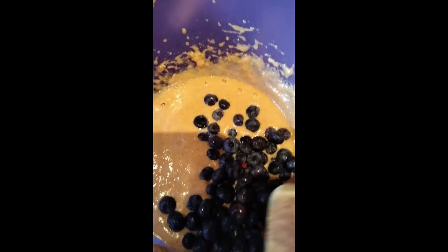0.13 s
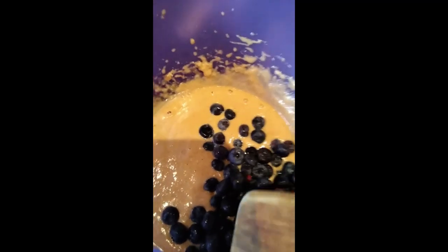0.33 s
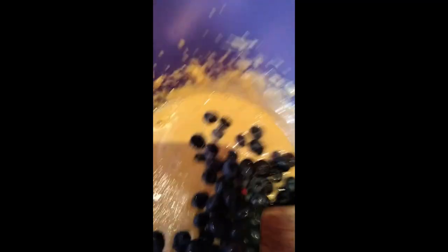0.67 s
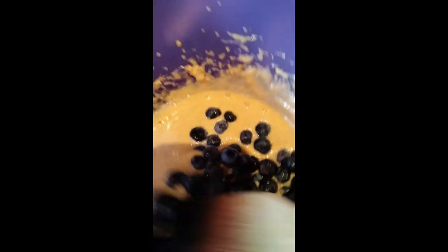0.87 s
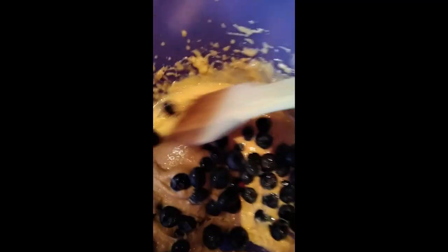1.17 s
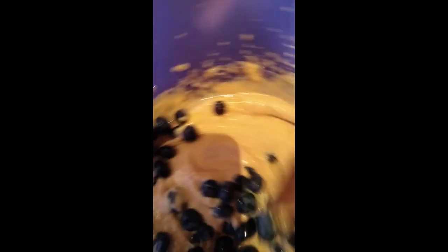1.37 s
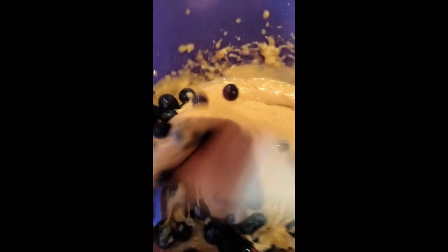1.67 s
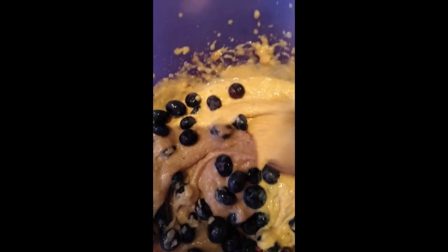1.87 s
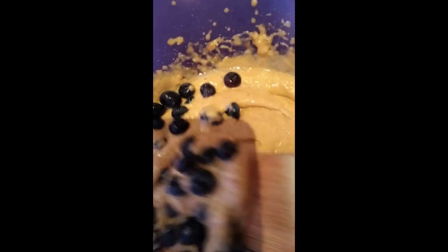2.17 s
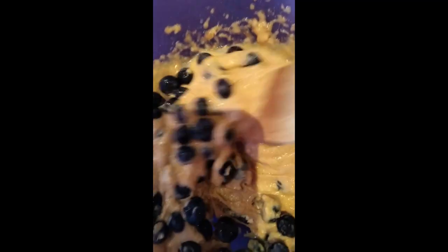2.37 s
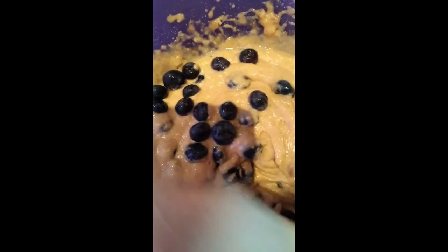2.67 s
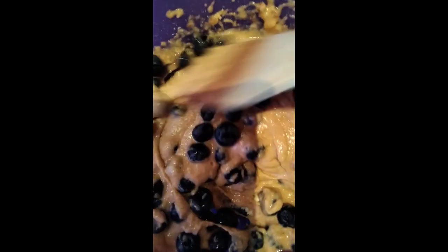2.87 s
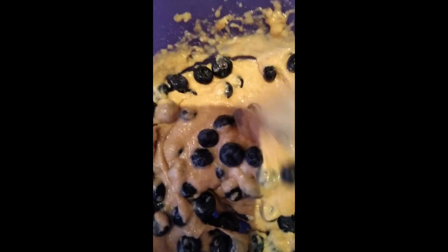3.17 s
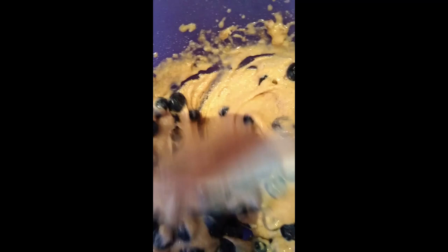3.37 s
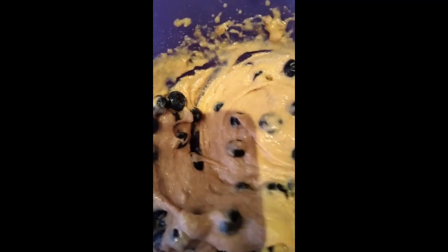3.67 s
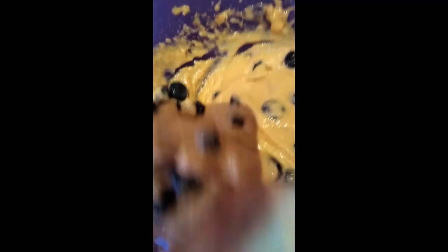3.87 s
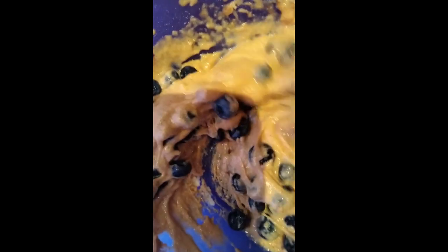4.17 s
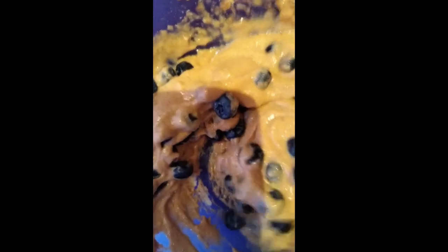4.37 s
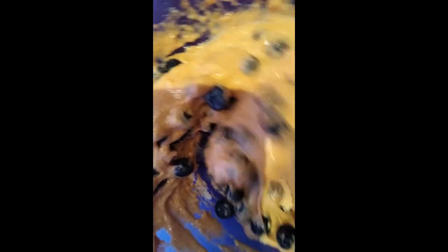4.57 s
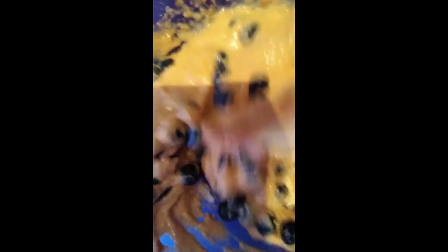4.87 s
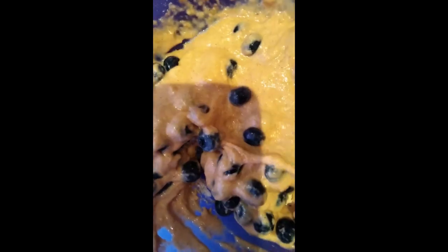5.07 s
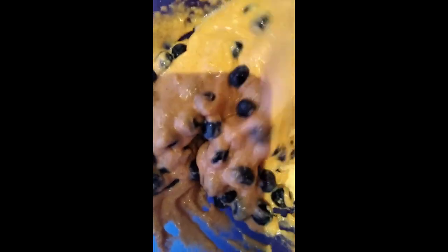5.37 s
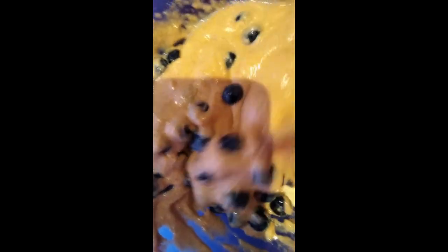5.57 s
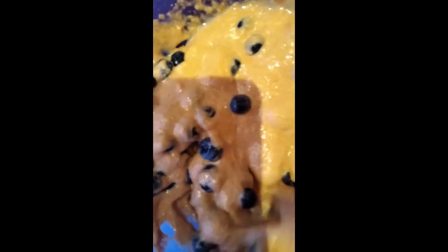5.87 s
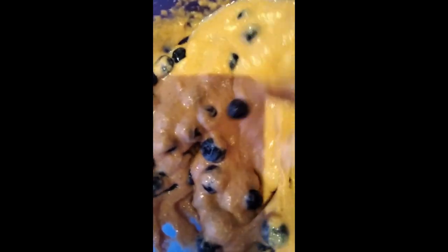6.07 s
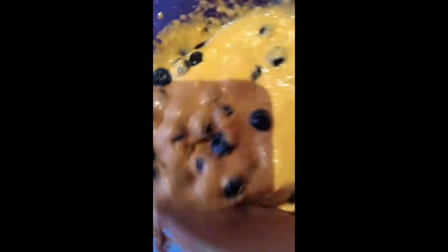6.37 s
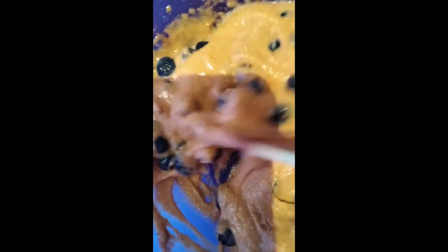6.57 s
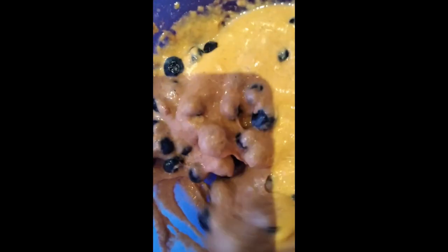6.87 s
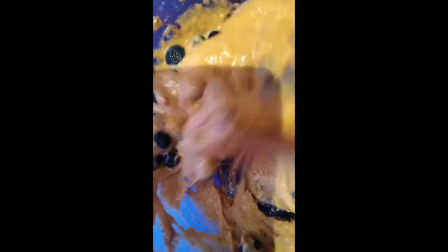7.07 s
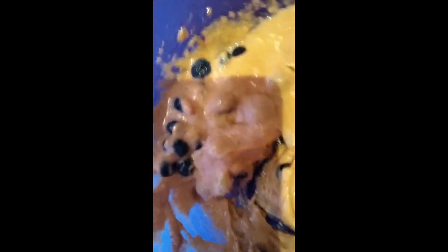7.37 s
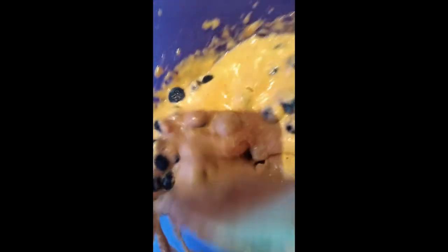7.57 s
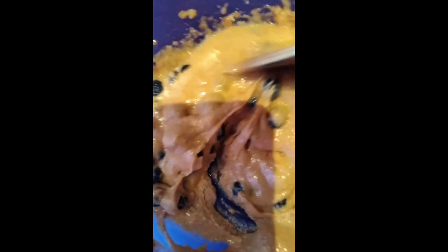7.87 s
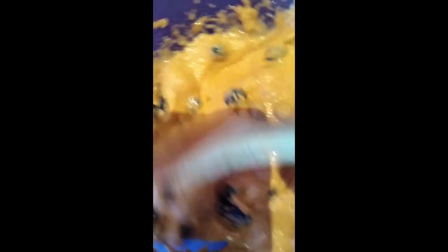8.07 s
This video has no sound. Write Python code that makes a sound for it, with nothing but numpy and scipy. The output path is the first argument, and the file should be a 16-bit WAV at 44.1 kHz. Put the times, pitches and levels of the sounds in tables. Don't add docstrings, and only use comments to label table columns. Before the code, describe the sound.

Very close stereo handheld microphone in a quiet kitchen. After a near-silent start, a wooden spatula folds thick batter in a plastic bowl: each stroke begins with a hollow knock and drags into a low hum, dry rasp and wet fizz. Sticky smacks and ticks fill the gaps. A glass on the left rings clearly early on, then faintly later.

```python
import sys
import numpy as np
from scipy import signal
from scipy.fft import rfft, irfft, next_fast_len
from scipy.io import wavfile
from scipy.ndimage import uniform_filter1d

SR = 44100
rng = np.random.default_rng(int(sys.argv[2]) if len(sys.argv) > 2 else 0)


def put_to_file(sound):
    columns = np.atleast_2d(sound).T
    safe = np.clip(columns, -1, 1)
    whole_steps = np.round(safe * 32767)
    wavfile.write(sys.argv[1], SR, whole_steps.astype(np.int16))


def undo_db(level):
    steps = np.asarray(level, float) / 20
    return 10 ** steps


N = 362502


def evened(x):
    return x / np.sqrt(np.mean(x ** 2) + 1e-20)


def peaked(x, db):
    return undo_db(db) * x / abs(x).max()


def read(points, hz):
    f, value = np.transpose(points)
    return np.interp(np.log(hz + 1), np.log(f + 1), value)


def add(mix, s, sound):
    part = mix[..., round(s * SR):][..., :sound.shape[-1]]
    part += sound[..., :part.shape[-1]]


def resonate(x, hz, width):
    pole = np.exp((2j * np.pi * hz - np.pi * width) / SR)
    return 2 * signal.lfilter([1 - abs(pole)], [1, -pole], x).real


def steep(x, hz, width):
    return resonate(resonate(x, hz, width), hz, 3 * width)


def shaped(x, gain):
    size = next_fast_len(N)
    return irfft(rfft(x, size) * gain(np.fft.rfftfreq(size, 1 / SR)), size)[..., :N]


def sides(pan_db):
    half_db = np.asarray(pan_db) / 2
    return undo_db(np.array([half_db, -half_db]))


def paired(a, b, alike):
    share = lambda hz: np.clip(read(alike, hz), 0, 1)
    rest = lambda hz: np.sqrt(1 - share(hz) ** 2)
    return np.array([shaped(a, share) + shaped(b, rest), a])


def wander(hz):
    return evened(shaped(rng.standard_normal(N), lambda f: 1 / (1 + (f / hz) ** 4)))


def patchy(x, patch_db):
    z = signal.stft(x, nperseg=256)[2]
    clumps = uniform_filter1d(rng.standard_normal(z.shape[1:]), size=6, axis=0)
    clumps = uniform_filter1d(clumps, size=8, axis=1)
    return evened(signal.istft(z * undo_db(patch_db * evened(clumps)), nperseg=256)[1][:, :N])


def drifting(x, share, chance, speed=1):
    place = np.cumsum(speed * (1 + share * np.tanh(chance)))
    return np.array([np.interp(place % (N - 1), np.arange(N), v) for v in x])


# f/Hz, level/dB per Hz
KITCHEN = [(28, -3.5), (53, 0.5), (80, -21), (120, -2), (185, -21), (390, -18), (1600, -52), (16000, -59)]
# f/Hz, likeness/0-1 (below 0 counts as none)
KITCHEN_ALIKE = [(60, -1), (380, -0.35), (2380, -0.03), (15000, -0.02)]


def kitchen():
    air = paired(*rng.standard_normal((2, N)), KITCHEN_ALIKE)
    return undo_db(-56) * patchy(shaped(air, lambda hz: undo_db(read(KITCHEN, hz))), 0.87)


# factor on the wall pitch, width/Hz, right level/dB, left level/dB
WALL = [(0.59, 90, -16, -1), (0.79, 87.8, 5, 4.5), (1.01, 94.8, 12, 2), (1.331, 120, -8, -0.5)]


def wall(force, pitch_hz, spot_db=(0, 0, 0, 0)):
    left, right = 0, 0
    for (factor, width, right_db, left_db), more_db in zip(WALL, spot_db):
        ring = undo_db(more_db) * steep(force, factor * pitch_hz, width)
        left = left + undo_db(left_db) * ring
        right = right + undo_db(right_db) * ring
    return np.array([left, right])


# start t/s, length/s, share of the length before the peak/0-1,
# pressure level/dB, wet film level/dB
STROKES = [(0.28, 0.094, 0.44, -82, -83), (0.665, 0.17, 0.17, -51.5, -72), (1.001, 0.041, 0.2, -54, -58),
           (4.246, 0.062, 0.24, -75.5, -78.5), (4.699, 0.046, 0.74, -55.5, -79),
           (7.242, 0.056, 0.58, -54.5, -74.5), (7.761, 0.06, 0.3, -79, -63), (8.09, 0.06, 0.75, -60, -68),
           (0.716, 0.3, 0.94, -63, -52), (1.055, 0.081, 0.26, -64, -57.5), (1.156, 0.18, 0.41, -33.5, -53),
           (1.321, 0.47, 0.41, -43, -53), (1.611, 0.25, 0.04, -50, -53.5),
           (2.059, 0.379, 0.28, -49.5, -54.5), (2.67, 0.2, 0, -42.5, -48), (2.791, 0.23, 0.56, -36, -52.5),
           (3.283, 0.26, 0.64, -50, -55), (3.541, 0.1, 0.52, -72.5, -62.5), (3.702, 0.45, 0.21, -47.5, -50),
           (4.17, 0.059, 0.4, -53.5, -68), (4.299, 0.18, 0.68, -61, -56), (4.519, 0.19, 0.53, -44.5, -60.5),
           (5.146, 0.26, 0.16, -50.5, -55.5), (5.449, 0.13, 0.65, -33, -52.5),
           (5.579, 0.26, 0.21, -45.5, -54.5), (6.038, 0.11, 0.51, -41.5, -52.5),
           (6.118, 0.444, 0.49, -47.5, -52), (6.652, 0.2, 0.6, -58, -58), (6.88, 0.36, 0.04, -46.5, -53.5),
           (7.349, 0.41, 0.34, -52.5, -56.5), (7.846, 0.25, 0.58, -30, -52.5),
           (8.148, 0.091, 0.82, -54, -54.5)]
DRY_DB = [0, -12, 1, 1, -10, -4, 1, 0, -35, 2, -7, 1.5, -1, -5.5, 9.5, -1, 5, -3, 3, -2, 6.5, -6, 1.5, -4,
          2, -1.5, 8.5, -1, -0.5, -0.5, -7.5, -4]
# middle t/s, half width/s, bite level/dB, pressure level/dB
BITES = [(0.703, 0.12, -46.5, -80), (1.031, 0.011, -46.5, -49), (1.07, 0.0038, -33.5, -49.5),
         (1.417, 0.048, -36, -36.5), (1.62, 0.035, -41, -37), (1.684, 0.021, -29.5, -45),
         (2.327, 0.085, -45, -66), (2.415, 0.057, -62.5, -57), (2.746, 0.023, -30.5, -41.5),
         (2.959, 0.018, -33, -29), (3.374, 0.046, -47, -44.5), (3.86, 0.033, -42.5, -52),
         (4.124, 0.0078, -43, -52), (4.438, 0.016, -43.5, -54.5), (4.56, 0.014, -37.5, -49.5),
         (5.242, 0.022, -26, -35.5), (5.313, 0.012, -37, -50), (5.537, 0.024, -40.5, -52.5),
         (5.685, 0.028, -30, -45), (6.256, 0.032, -32.5, -33), (6.313, 0.018, -26, -36.5),
         (1.075, 0.0059, -69, -41.5), (6.9, 0.0049, -33, -53), (7.043, 0.028, -38, -38),
         (6.53, 0.0067, -47.5, -56), (7.352, 0.052, -82, -52), (7.585, 0.063, -40.5, -44.5),
         (7.931, 0.032, -58.5, -29.5), (8.006, 0.018, -31.5, -58), (8.052, 0.041, -33.5, -36.5)]


def contact(t):
    land_s, part_s = 0.004, 0.013
    rasp_share = 0.9
    skim_s, shudder_t60_s = 0.024, 0.44
    press, rasp, film = np.zeros((3, N))
    down, brush = np.zeros((2, N))
    for (start, length, share, press_db, film_db), dry_db in zip(STROKES, DRY_DB):
        share = np.clip(share, .05, .95)
        u = (t - start) / length
        rise = np.clip(1 - u / share, 0, 1) ** 1.08
        fall = np.clip((u - share) / (1 - share), 0, 1) ** 1.2
        touch = np.clip(np.minimum(u / land_s, (1 - u) / part_s) * length, 0, 1)
        p_db = press_db - 16 * rise - 20 * fall
        f_db = film_db - 24.5 * rise - 12 * fall
        press = press + touch * undo_db(p_db)
        down = np.maximum(down, touch)
        film = film + touch * undo_db(f_db)
        rasp = rasp + touch * undo_db(rasp_share * p_db + (1 - rasp_share) * f_db - 3 + dry_db)
    for s, width, bite_db, press_db in BITES:
        arch = np.exp(-abs((t - s) / width) ** 1.5)
        press = press + undo_db(press_db) * arch
        rasp = rasp + undo_db(bite_db) * arch
        film = film + undo_db(bite_db - 22.5) * arch
    for s, blow_db, *_ in KNOCKS:
        press = press + (t > s) * undo_db(blow_db - 18.5 - 60 * abs(t - s) / shudder_t60_s)
        skim = (t > s - skim_s) * (t <= s) * undo_db(blow_db - 31)
        press = press + skim
        brush = brush + skim * undo_db(-15.0)
    return press, rasp * down + brush, film * down, down


def slips(per_s, spread_db, smooth):
    size = undo_db(spread_db * np.minimum(rng.exponential(1, N), 4)) * rng.choice([-1., 1.], N)
    clicks = evened(size * (rng.random(N) < per_s / SR))
    return evened(clicks + smooth * rng.standard_normal(N))


BITE_HZ = [1660, 2600, 3270, 1885, 2478, 2830, 2500, 2480, 3000, 2430, 2270, 2400, 1985, 3200, 2660, 2230,
           2500, 1970, 3320, 2110, 2600, 1800, 2400, 2340, 2700, 1390, 2900, 1900, 3300, 1890]


def bites(rough):
    out = np.zeros((2, N))
    for (s, width, bite_db, _), hz in zip(BITES, BITE_HZ):
        at = round((s - 3 * width) * SR)
        part = rough[:, at:at + round(6 * width * SR)]
        t = np.arange(part.shape[1]) / SR
        arch = np.exp(-abs((t - 3 * width) / width) ** 1.3)
        add(out, at / SR, undo_db(bite_db - 14) * arch * evened(steep(part, hz, 0.24 * hz)))
    return out


RIM_HZ, RIM_WIDTH = 1076, 110
# f/Hz, width/Hz, level/dB
THUD = [(90, 136, -4.5), (156.2, 19, 0.3)]
# f/Hz, width/Hz, level/dB
RASP = [(1030, 280, 11), (1874, 120, 11), (2400, 420, 5), (2994, 600, 8.5), (4300, 750, -12)]
# f/Hz, level/dB per Hz
FIZZ = [(900, -8.5), (2000, -4), (4000, -3), (6500, -3.5), (9300, -4), (11000, -11), (13000, -16.5),
        (15500, -25)]
# f/Hz, likeness/0-1
ALIKE = [(200, .9), (1000, .85), (3000, .6), (6000, .45), (16000, .3)]
# t/s, f/Hz
HEIGHT = [(1.25, 500.1), (2.72, 460.2), (2.88, 570.3), (3.35, 430.5), (5.4, 560.3), (7.88, 479.3),
          (8.05, 530.7)]


def drag():
    t = np.arange(N) / SR
    press, scrape, wet, down = contact(t)
    pressure = wander(33)

    stick = steep(slips(300, 2.2, 1.1) * undo_db(0.6 * pressure), 600, 1300)
    sag = evened(uniform_filter1d(pressure, size=2500))
    height = np.interp(t, *np.transpose(HEIGHT)) / 524
    hum = drifting(wall(stick, 524), .09, sag, height)
    hum = patchy(hum + undo_db(-3.5) * steep(stick, RIM_HZ, RIM_WIDTH), 3.0)

    counter = paired(*rng.standard_normal((2, N)), [(40, 0.23), (250, 0.24)])
    counter = counter * undo_db(6.0 * np.tanh(wander(16)))
    rumble = evened(sum(undo_db(db) * steep(counter, f, 2.4 * w) for f, w, db in THUD))
    rumble = rumble * sides(5.0)[:, None]

    rough = paired(slips(1400, 4.4, 0.44), slips(1900, 1.9, 0.87), ALIKE)
    modes = [undo_db(db) * steep(rough, f, w) for f, w, db in RASP]
    loose = drifting(sum(modes[2:]), .05, wander(6))
    rasp = patchy(steep(sum(modes[:2]) + loose, 2600, 3500), 4.0)

    film = paired(slips(1900, 3.4, 11.0), slips(1900, 4.0, 0.92), ALIKE)
    fizz = patchy(shaped(film, lambda hz: undo_db(read(FIZZ, hz))), 0.93)

    upper = scrape * undo_db(-13.5 + 1.2 * pressure) * rasp + down * bites(rough)
    upper = upper + wet * undo_db(-2.0 + 2.97 * wander(47)) * fizz
    ooze = undo_db(-85 + 4.0 * wander(60)) * (fizz + .3 * rasp) * (t > .66)
    lower = uniform_filter1d(press, size=350) * undo_db(1) * hum
    lower = lower + undo_db(-72) * hum * (t > STROKES[1][0])
    shifting = undo_db(-37.5) * press ** 0.42 * rumble
    return lower + shifting + (upper + ooze) * sides(-9)[:, None]


def let_go(pops):
    out, t = np.zeros((2, N)), np.arange(700) / SR
    grit = rng.standard_normal((len(pops), 2, len(t)))
    for (s, db, hz), (a, b) in zip(pops, grit):
        snap = np.array([a + .5 * b, a]) * undo_db(-60 * t / 0.007) * np.minimum(t / 0.0009, 1)
        pop = steep(snap, hz, 0.14 * hz) + 0.19 * steep(snap, 5000, 3000)
        add(out, s, peaked(pop, db) * sides(-9)[:, None])
    return out


# t/s, peak level/dB,
# f/Hz
MORE_SMACKS = [(0.4854, -80, 1860), (1.0181, -41, 2670), (1.082, -32, 2300), (1.378, -33.5, 2240),
               (1.42, -33, 1900), (1.4767, -52, 2307), (2.123, -37.5, 2890), (2.8804, -34, 2300),
               (3.6022, -39, 3770), (3.9827, -36, 1460), (4.0891, -34, 1610), (4.2764, -67, 2110),
               (4.3819, -45, 2100), (4.4432, -27, 3460), (4.497, -64, 2010), (4.558, -42, 2450),
               (4.8743, -51, 5000), (5.1244, -60, 2400), (5.208, -32, 2090), (5.233, -33, 1990),
               (5.301, -36, 2510), (5.6135, -37, 4660), (6.211, -38, 1850), (6.2342, -42, 1870),
               (6.3194, -36, 3810), (6.394, -29, 1630), (6.4, -26.5, 3900), (6.419, -39, 2470),
               (6.53, -34, 4800), (6.546, -40, 6550), (7.024, -33, 3170), (7.152, -36, 8900), (7.604, -33, 1900),
               (7.7737, -50, 3820), (7.784, -50, 2690), (7.989, -25, 1860), (8.1066, -35, 2486),
               (8.1283, -43, 1900)]


def more_smacks():
    return let_go([(s, db - 5.5, hz) for s, db, hz in MORE_SMACKS])


# t/s, blow level/dB, wall f/Hz, counter thud level/dB, edge click level/dB
KNOCKS = [(0.669, -51, 556, -34, -40), (1.074, -69.5, 551, -36.5, -38.5), (1.163, -26.5, 593, -26.5, -58),
          (1.377, -49, 670, -52, -37), (1.571, -32, 418, -25, -24), (2.13, -42.5, 360, -31.5, -98),
          (2.392, -35.5, 377, -45, -87), (2.673, -31, 478, -22, -24), (2.832, -24.5, 537, -22.5, -54),
          (3.302, -23, 603, -24.5, -31.5), (3.763, -36.5, 464, -29.5, -37.5), (3.834, -36.5, 745, -45, -45),
          (3.879, -41, 367, -38, -75), (4.115, -42.5, 351.5, -56, -53), (4.535, -56.5, 650, -60, -52),
          (1.113, -47.5, 541, -40, -84), (5.153, -35.5, 657, -28, -37), (5.455, -25, 493, -36, -92),
          (6.058, -28, 560, -33.5, -50.5), (6.235, -48, 480, -56, -42), (6.763, -38, 418, -36, -37.5),
          (6.895, -25, 604, -25, -47), (7.476, -35, 396, -30.5, -37.5), (7.867, -23, 575, -25, -30.5)]
# low mode level/dB, second mode level/dB, top mode level/dB,
# rim level/dB, left-right level/dB
SPOTS = [(1, -2.5, 3, 6, 10), (-8, -11, 5, 23, -9), (6.5, -1, -2, 0, -5.5), (-1.5, -1.5, 5.5, 3.5, 3),
         (2, -1, 8.5, -7, 2.5), (17.5, 3, 11, -13, 0), (-9, -1.5, 0.5, -15, 5.5), (8.5, 4.5, 6.5, -6.5, 2),
         (5, 0.5, -6, -5, -2.5), (9.5, 4, 7, 1, -6.5), (-8, 5, 10.5, -16, 2.5), (-6, -14, -14, -16, 7),
         (1, 2.5, 1, -10, 5.5), (1.5, 1.5, 2.5, -16, 6.5), (-7, 4, 2, 4.5, -7), (0.5, -2.5, 0, 1, 1),
         (-7, 2.5, 11, -16, 0.5), (-4, -1, -10, 0, 1.5), (0, 0, -13, -4, -1), (-9, 2, -6, 7.5, 3),
         (-9.5, 10, 17.5, 0.5, -6.5), (1, 3.5, 7.5, -4, -1.5), (7, 6.5, 15, -4, 3), (5.5, 0, 2.5, 2.5, -4)]
BOUNCES = [0.047, 0.064, 0.05, .2, 0.13, 0.31, 0.08, 0.14, 0.089, 0.28, 0.13, 0.2, 0.26, 0.16, 0.19, 0.22,
           0.26, 0.14, 0.32, 0.14, 0.14, 0.32, 0.35, 0.8]
FAR_SIDE = [1.57, 2.672]
# t/s, thud level/dB
BUMPS = [
    (1.025, -37),
    (3.706, -44),
    (4.45, -33.5),
    (4.872, -45.5),
    (5.586, -38.5),
]


def knocks():
    push_lead_s, far_lead_s = .001, .001
    choke_s, choke_db = 0.0093, -9.5
    out, t = np.zeros((2, N)), np.arange(6000) / SR
    hits = KNOCKS + [(s, db - 18.5, 513, db, db - 54) for s, db in BUMPS]
    spots = SPOTS + [np.zeros(5)] * len(BUMPS)
    bounces = BOUNCES + [.2] * len(BUMPS)
    luck = rng.random((len(hits), 3))
    grit = rng.standard_normal((len(hits), len(t)))
    push = lambda at, soft: -np.exp(-.5 * ((t - at) / soft) ** 2)
    for hit, (u, v, w), noise, spot, again in zip(hits, luck, grit, spots, bounces):
        s, blow_db, hz, thud_db, click_db = hit
        low_db, second_db, top_db, rim_db, pan_db = spot
        bounce = again * push(0.006195 + 0.0014 * u, 0.0004)
        force = push(0.00073, 0.00031) + bounce + 0.0077 * noise * undo_db(-60 * t / 0.034)

        bent_hz = 560 * (hz / 560) ** .5
        ring = wall(force, bent_hz, (low_db, second_db, 0, top_db))
        ring = ring * undo_db(choke_db / (1 + np.exp(-np.minimum((t - choke_s) / 0.0011, 50))))

        tuning = (1.1 + 0.12 * v, 0.85 + 0.032 * w)
        thud = np.array([sum(undo_db(db) * steep(force, f * k, width) for f, width, db in THUD)
                         for k in tuning])

        rim = resonate(resonate(force, RIM_HZ, RIM_WIDTH), RIM_HZ, 230)
        slap = steep(np.gradient(push(.001, 0.00016)), 1229, 330)
        blade = steep(np.gradient(push(0.00088, .0001)), 1970, 150)
        rim = peaked(rim, 0) + peaked(slap, -13) + peaked(blade, -15)
        rim_level_db = 0.81 * blow_db + 0.27 * click_db + 9 + rim_db + 1.5 * np.log2(hz / 500)
        rim = peaked(rim, rim_level_db) * sides(-13.0)[:, None]

        fading = undo_db(-60 * t / 0.018) + 0.18 * undo_db(-60 * t / 0.14)
        edge = noise * fading * np.minimum(t / 0.00064, 1)
        click = sum(undo_db(db) * resonate(edge, f, 3.1 * width) for f, width, db in RASP)
        click = steep(click, 800, 2400)
        add(out, s, peaked(click, click_db + 3.5) * sides(-20.5)[:, None])

        body = peaked(ring, blow_db + 22.5) * sides(pan_db)[:, None] + rim
        body = body + peaked(thud, thud_db + 7.5) * sides(1.8)[:, None]
        far = min(abs(s - np.array(FAR_SIDE))) < .005
        add(out[0], s - push_lead_s - far * far_lead_s, body[0])
        add(out[1], s - push_lead_s, body[1])
    return out


# middle t/s, length/s, f/Hz, level/dB
SQUEAKS = [
    (0.926, 0.11, 2600, -57.5),
    (1.256, 0.18, 1940, -60),
    (1.436, 0.17, 7090, -56.5),
    (3.992, 0.1, 1440, -53),
    (3.999, .1, 970, -50),
    (5.545, 0.022, 1980, -48),
]


def squeaks():
    out = np.zeros((2, N))
    grit = rng.standard_normal((len(SQUEAKS), SR // 4))
    for (s, length, hz, db), noise in zip(SQUEAKS, grit):
        size = round(length * SR)
        tone = evened(steep(noise, hz, 91))[:size]
        add(out, s - length / 2, undo_db(db) * tone * np.hanning(size))
    return out


# t/s, peak level/dB, f/Hz
TICKS = [(0.8743, -49, 4740), (1.198, -42, 8100), (2.104, -50, 7300), (2.4678, -56.5, 2680),
         (2.5642, -60, 5430), (3.025, -49.5, 7050), (3.049, -68, 4000), (3.081, -55, 3270),
         (3.1485, -62, 7870), (3.161, -55, 9100), (3.2004, -75, 4020), (3.257, -61.5, 2580),
         (4.191, -53, 8600), (4.2562, -60.5, 8800), (4.28, -63, 2980), (4.344, -56, 5870),
         (4.749, -72, 2480), (4.802, -54, 2750), (5.93, -64, 3030), (6.0042, -58, 3080), (6.598, -60, 3910),
         (6.651, -53, 3560), (6.668, -52, 2660), (6.7015, -53, 4970), (6.716, -47, 4760),
         (6.7424, -58, 2660), (6.793, -49, 2570), (7.28, -58, 2550), (7.765, -64.5, 4000),
         (7.948, -37.5, 2470)]


def ticks():
    return let_go([(s, db + 2, hz) for s, db, hz in TICKS])


# t/s, peak level/dB, f/Hz
SMACKS = [(0.9248, -38, 5430), (0.9602, -37, 7380), (0.976, -42.5, 4300), (1.0006, -37, 4560),
          (1.432, -33.5, 2150), (1.5344, -41.5, 4060), (1.9722, -49, 3130), (2.164, -55, 4300),
          (2.318, -31.5, 9050), (2.7282, -48.5, 2450), (2.7506, -26, 2380), (2.8898, -37, 2550),
          (3.3767, -37.5, 2600), (3.5068, -31.5, 7350), (3.5853, -45, 7230), (4.2018, -49.5, 9350),
          (4.8853, -43, 5360), (5.4964, -34.5, 3440), (5.7887, -36.5, 3190), (5.8899, -54, 3180),
          (6.2617, -44.5, 2030), (6.3635, -30, 6570), (6.3694, -34, 3900), (6.4593, -54, 3610),
          (7.0943, -31.5, 4850), (7.1387, -43.5, 8900), (7.1741, -40, 9270), (7.3961, -45, 9650),
          (7.546, -32.5, 2840), (7.7184, -44.5, 4600)]


def smacks():
    return let_go(SMACKS)


# t/s, peak level/dB, wall f/Hz
NUDGES = [(1.044, -40, 300), (2.18, -40, 466), (2.301, -57, 484), (2.336, -44, 600), (2.695, -27, 460),
          (2.89, -23.5, 616), (3.743, -33, 443), (4.014, -40, 596), (4.363, -42.5, 454),
          (5.214, -38.5, 546), (5.235, -33, 646), (5.295, -52, 558), (5.314, -43, 670), (5.674, -39, 793),
          (6.197, -40, 584), (6.299, -28.5, 587), (6.399, -36.5, 673), (6.496, -37.5, 539),
          (6.525, -39, 614), (7.396, -45, 470), (7.852, -38, 568), (7.939, -42, 487), (7.963, -32, 470),
          (8.178, -39, 518)]


def nudges():
    out, t = np.zeros((2, N)), np.arange(3000) / SR
    push = -np.exp(-.5 * ((t - .001) / 0.00037) ** 2)
    for s, db, hz in NUDGES:
        add(out, s - .001, peaked(wall(push, hz), db + 7.5))
    return out


# t/s, level/dB, contact length/s, scratch level/dB, left-right level/dB
BRUSHES = [
    (1.633, -13.5, 0.048, 4, 13.5),
    (6.3, -26.5, 0.015, 2.5, 16.5),
]
GLASS_HZ = [2696, 3766, 3926, 5285, 6626, 7079, 7170, 8570, 9822, 10675, 11570, 12520, 14276]
GLASS_T60 = [0.044, 0.089, 0.28, 0.18, 0.13, 0.14, 0.15, 0.1, .16, .15, 0.2, .14, .13]
GLASS_DB = [
    [-29, -5, -25.5, 0, -38.5, 1.5, -19, -12, -25, -27.5, -39, -33, -22.5],
    [10, 16, -2, -1, -28, -4.5, 5, 9, -9, -45, -57, -46, -32],
]
GLASS_TAIL_DB = {3766: -33, 3926: -11, 5285: -33, 7079: -53.5}
LASTING = [0.61, 0.78]
# f/Hz, width/Hz, level/dB
CLINKS = [
    [(2900, 420, -1.5), (4800, 630, -13.5)],
    [(2430, 330, 4.5), (7200, 450, -4)],
]


def glass():
    out, t = np.zeros((2, N)), np.arange(SR // 2) / SR
    dull = signal.butter(6, 8600, fs=SR, output="sos")
    for brush, levels, lasting, clinks in zip(BRUSHES, GLASS_DB, LASTING, CLINKS):
        s, db, contact_s, scratch_db, pan_db = brush
        waver = uniform_filter1d(rng.standard_normal((len(GLASS_HZ), len(t))), size=500, axis=1)
        flutter = undo_db(3.5 * evened(waver))
        held = 1 / (1 + np.exp(np.minimum((t - contact_s) / 0.0013, 50)))
        grind = rng.standard_normal((2, len(t))) * held
        grind = np.array([grind[0], .8 * grind[0] + .6 * grind[1]])
        free = np.cumsum(1 - 0.68 * held) / SR
        ring = 0
        for hz, t60, mode_db, fluttering in zip(GLASS_HZ, GLASS_T60, levels, flutter):
            dying = undo_db(-60 * free / (t60 * lasting))
            dying = dying + fluttering * undo_db(GLASS_TAIL_DB.get(hz, -99) - 60 * t / 0.76)
            tone = np.sin(2 * np.pi * (hz * t + rng.random())) * dying
            ring = ring + undo_db(mode_db) * (tone + 3.3 * steep(grind, hz, 45))
        scratch = resonate(grind * (0.093 + undo_db(-60 * t / 0.012)), 2800, 4300)
        scratch = signal.sosfilt(dull, scratch)
        sound = peaked(ring, 0) + peaked(scratch, scratch_db)
        for hz, width, clink_db in clinks:
            sound = sound + peaked(steep(1. * (t == 0), hz, width), clink_db)
        ending = np.clip((.228 - t) / .008, 0, 1)
        add(out, s, undo_db(db) * sound * ending * np.minimum(t / 0.0006, 1) * sides(pan_db)[:, None])
    return out


# f/Hz, t60/s
TAIL = [(100, 0.49), (500, 0.32), (2000, 0.017), (8000, 0.058)]


def room(x):
    taps = rng.standard_normal((2, SR // 2)) * (np.arange(SR // 2) > 250)
    hz, t, z = signal.stft(taps, SR, nperseg=256)
    tail = signal.istft(z * undo_db(-60 * t / read(TAIL, hz)[:, None]), SR, nperseg=256)[1]
    return signal.fftconvolve(x, tail / np.linalg.norm(tail[0]), axes=1)[:, :N]


# t/s, left-right level/dB
ACROSS = [(.66, 6.5), (1.031, 0), (1.07, -17.5), (1.117, 2), (1.3, 4.5), (1.56, 5.5), (1.903, 2),
          (2.5, -1.2), (2.701, 7), (2.85, 0.5), (3.299, 5), (3.77, 4.5), (4.1, -0.5), (4.6, 2.5),
          (5.499, 0), (6.9, 2), (7.47, 1), (7.901, 3.5)]
# f/Hz, left lead/radians
PORTS = [(60, -.9), (200, -1.3), (520, -2.6), (1120, -4.1), (2150, -6.5), (16000, -46.0)]


def scene():
    across = np.interp(np.arange(N) / SR, *np.transpose(ACROSS))
    bowl = drag() + more_smacks() + knocks() + squeaks() + ticks() + smacks() + nudges()
    bowl = bowl * sides(across)
    too_small_for_bass = signal.butter(3, 62, "high", fs=SR, output="sos")
    bowl = signal.sosfilt(too_small_for_bass, bowl)
    late = shaped(bowl[0], lambda hz: np.exp(1j * np.interp(hz, *np.transpose(PORTS))))
    near = np.array([late, bowl[1]]) + glass()
    return near + undo_db(-21) * room(near) + kitchen()


def top_cut(x):
    return signal.sosfilt(signal.butter(12, 16390, fs=SR, output="sos"), x)


def record(dry):
    limited = dry / (1 + abs(dry / .94) ** 6) ** (1 / 6)
    mix = shaped(limited, lambda hz: np.clip((15850 - hz) / 300, 0, 1))
    return top_cut(mix)


dry = scene()
out = record(dry)
put_to_file(out)
```